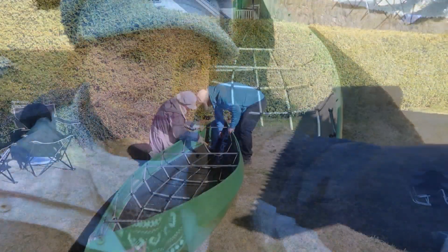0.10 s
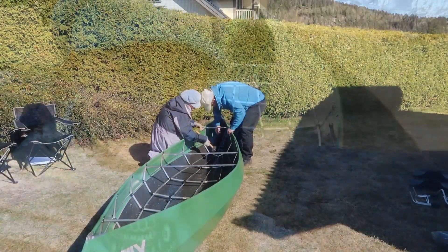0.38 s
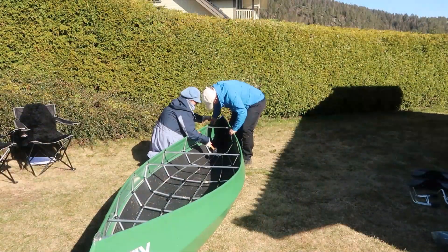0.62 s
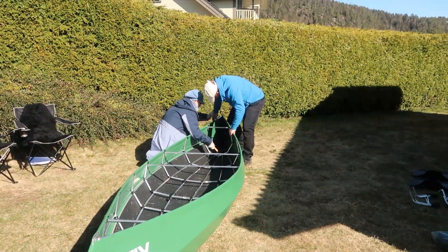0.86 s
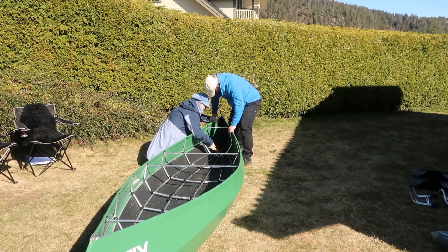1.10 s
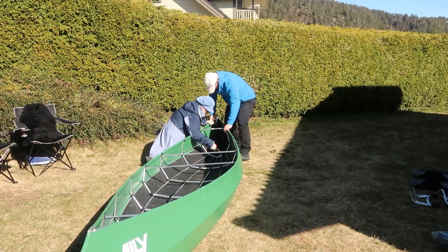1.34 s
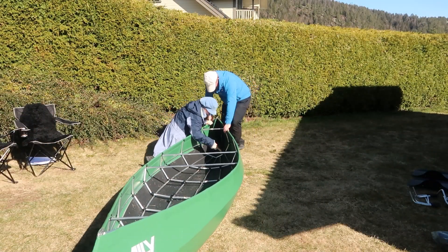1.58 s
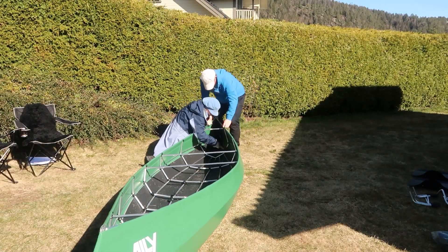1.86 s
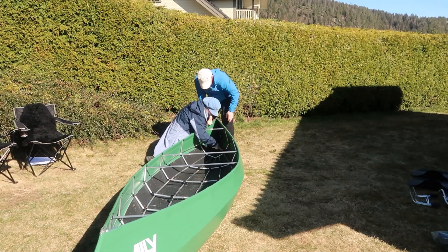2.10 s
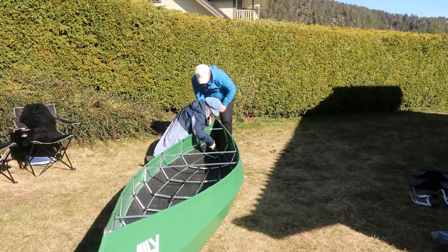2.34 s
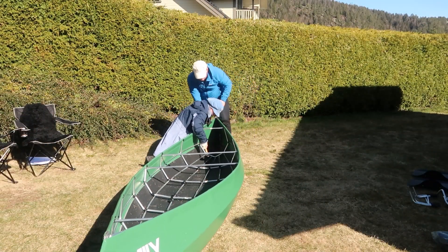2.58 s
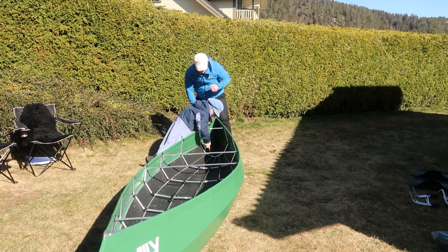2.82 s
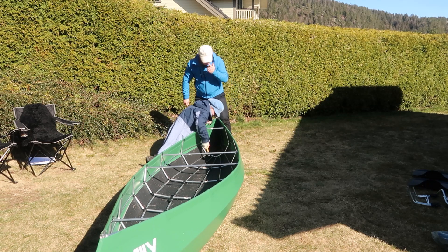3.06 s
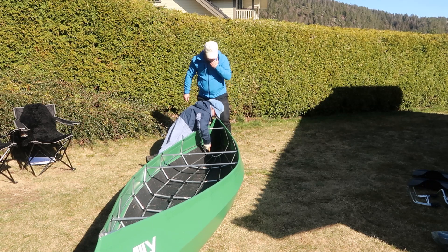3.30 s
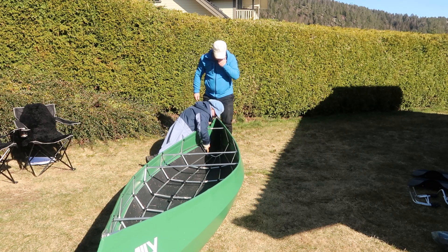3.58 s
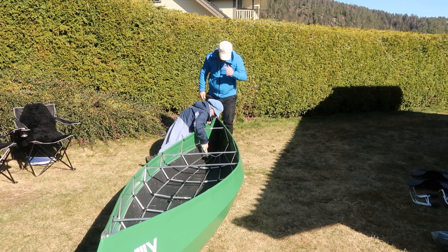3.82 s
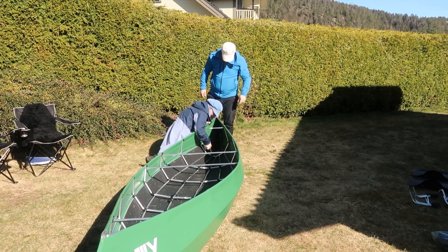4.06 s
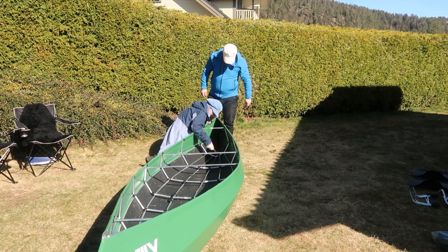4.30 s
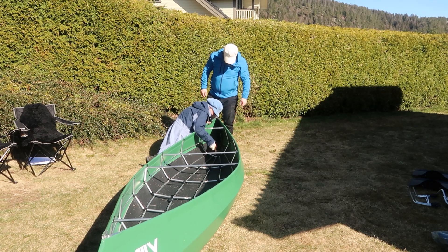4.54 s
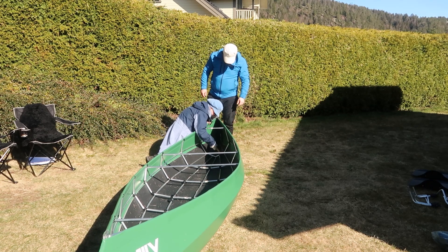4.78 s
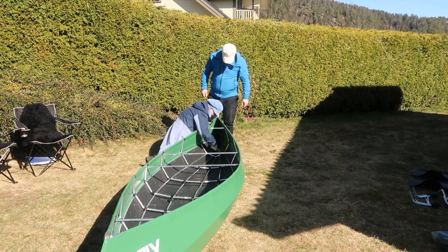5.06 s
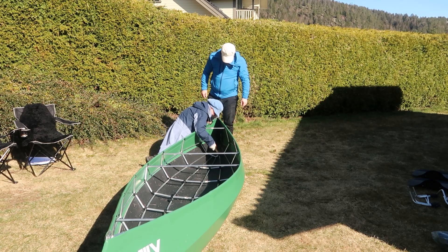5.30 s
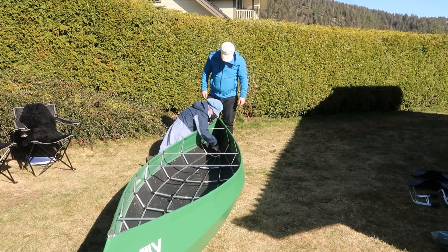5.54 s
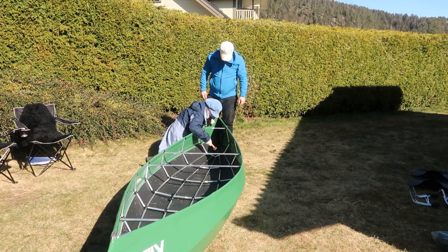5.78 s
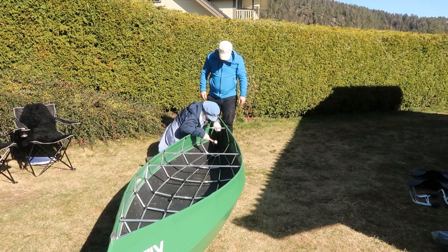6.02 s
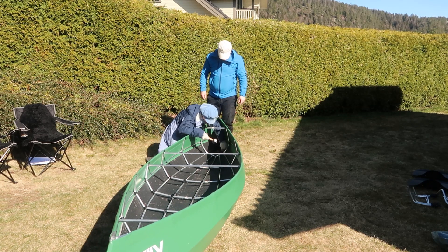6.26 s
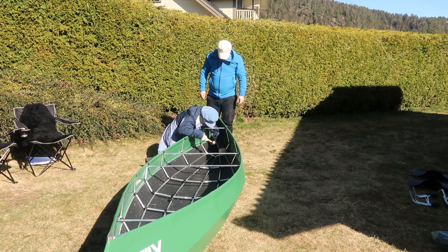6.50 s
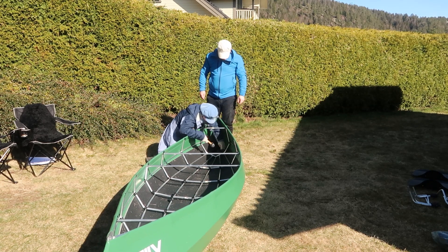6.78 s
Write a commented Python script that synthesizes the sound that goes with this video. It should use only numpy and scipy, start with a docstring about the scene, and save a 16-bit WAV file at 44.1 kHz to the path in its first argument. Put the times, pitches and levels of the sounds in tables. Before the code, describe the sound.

A short stretch of soft airy hiss with tiny scuffs drops into a blink of silence. Then a quieter open garden, where wind thuds in low flutters against the microphone. From about two seconds, nine hard, dry mallet knocks hit a light tube frame at uneven gaps, some with small rebounds and a faint scattered echo from house and hedge. The knocks stop before six seconds and the wind swells.

```python
"""Mallet blows on a folding boat

Outdoors on a lawn, a mallet knocks a boat's tube frame nine times; some blows rebound.
Each blow is a burst of contacts exciting damped modes; scattered echoes of house and hedge answer.
Wind buffets the microphone as clumped pressure pulses over a quiet garden hiss of filtered noise.
A closer view with a slightly louder air and small scuffs comes first and ends in a short silence.
One faint bird whistle, a falling sine, sounds late on the lawn."""
import sys
import numpy as np
from scipy import signal
from scipy.fft import rfft, irfft
from scipy.io import wavfile
from scipy.ndimage import uniform_filter1d

SR = 44100
rng = np.random.default_rng(int(sys.argv[2]) if len(sys.argv) > 2 else 0)


def convert_level_to_amplitude(level_db):
    """Map a level in decibels to its linear amplitude factor."""
    exponent = np.asarray(level_db, float) / 20
    return 10 ** exponent


def waveform_to_disk(signal):
    """Save audio, clipped to [-1, 1], as 16-bit WAV at the path in sys.argv[1]."""
    frames = np.transpose(np.atleast_2d(signal))
    scaled = np.clip(frames, -1, 1) * 32767
    samples = np.round(scaled).astype(np.int16)
    wavfile.write(sys.argv[1], SR, samples)


N = 303981  # length [samples]

# Silence between close view and lawn: (start [s], end [s])
SILENCE_SPAN = (.654, .692)
# Air of the close view and of the lawn: (time [s], level [dB])
CLOSE_AIR_LEVEL = [(0.0, -53.5), (0.196, -56.5), (0.23, -54), (0.286, -57), (0.444, -56.5), (0.462, -57),
                   (0.652, -57.5)]
LAWN_AIR_LEVEL = [(.7, -69), (1.17, -69), (1.35, -64.5), (1.66, -68.5), (1.85, -64), (2.05, -74.5),
                  (2.44, -76.5), (2.9, -71.5), (3.5, -77.5), (4.0, -75.5), (4.45, -79), (4.85, -75),
                  (5.449, -77.5), (5.7, -75.5), (6.5, -69), (6.89, -70)]
# Spectra of the two airs: (frequency [Hz], density [dB per Hz])
CLOSE_AIR_SPECTRUM = [(15, -28.5), (25, -3), (96, -5), (177, -19.5), (202, -7.5), (318, -19), (414, -5.5),
                      (448, -19.5), (554, -16), (1360, -22.5), (2710, -20.5), (7420, -34), (14000, -53)]
LAWN_AIR_SPECTRUM = [(15, -36.5), (25, -11), (119, 5.5), (472, -8.5), (539, -17), (703, -3.5), (892, -9),
                     (1100, -9), (1730, -7), (4480, -15.5), (9660, -27), (11600, -31.5), (14000, -44)]
# Left-right correlation of the two airs: (frequency [Hz], correlation [-1 to 1])
CLOSE_AIR_CORRELATION = [(60, 1), (240, 0.526), (950, 0.34), (3770, -0.26), (15000, -0.64)]
LAWN_AIR_CORRELATION = [(60, 1.0), (240, 1.0), (950, 0.976), (3770, 0.21), (15000, -0.85)]
# Light scuffs and ticks of handling: (time [s], level before decay [dB], centre [Hz], decay time [s])
HANDLING_SCUFFS = [(0.215, -52.5, 2180, 0.029), (0.218, -54.5, 3300, 0.014), (.598, -60, 3850, .006),
                   (.641, -59, 3270, .006), (.644, -57, 720, .007), (0.748, -60.5, 2060, 0.0094),
                   (0.761, -66.5, 1050, 0.023), (1.287, -56, 800, 0.025), (1.452, -62, 767, 0.029),
                   (1.695, -53.5, 2190, 0.0056), (6.563, -63.5, 3770, 0.0094)]

# Steady part of the wind: (time [s], buffet level [dB], deep rumble level [dB])
STEADY_WIND = [(.7, -56.5, -79), (.82, -88, -82.5), (1.22, -70, -78.5), (1.4, -53, -52), (1.76, -65.5, -63),
               (2.3, -58, -53), (2.5, -65, -58.5), (3.05, -53.5, -54.5), (3.6, -52, -56),
               (3.75, -45, -56.5), (4.08, -39.5, -53.5), (4.2, -42.5, -65.5), (4.85, -48, -58.5),
               (4.97, -63.5, -57.5), (5.3, -47.5, -62), (5.73, -55, -56), (6.25, -46, -49.5),
               (6.89, -33.5, -64.5)]
# Separate puffs: (start [s], length [s], level [dB], bright edge against it [dB])
WIND_PUFFS = [(1.276, 0.054, -60.5, -10), (1.439, 0.047, -41, -33.5), (1.511, 0.0339, -46.5, -27),
              (1.595, 0.0443, -56, -22.5), (1.804, 0.0458, -44, -27.5), (1.897, 0.0565, -49, -31.5),
              (2.015, 0.0202, -53.5, -33.5), (2.063, 0.036, -48, -40), (2.129, 0.112, -47, -39.5),
              (2.2, 0.1911, -45.5, -22.5), (2.44, 0.0207, -53, -31.5), (2.491, 0.0653, -49, -43),
              (2.598, 0.0714, -47.5, -40.5), (2.705, 0.079, -46.5, -38), (2.833, 0.118, -42, -43.5),
              (2.959, 0.053, -44.5, -37), (3.071, 0.0435, -47, -42), (3.192, 0.0216, -42, -32.5),
              (3.251, 0.0988, -41, -34), (3.403, .045, -45.5, -34.5), (3.469, 0.0336, -42, -36.5),
              (3.539, 0.0744, -47, -44), (3.643, 0.113, -42, -34.5), (3.788, 0.0437, -38, -18),
              (3.856, 0.0971, -38, -15), (4.039, 0.105, -41, -14.5), (4.218, 0.0507, -40.5, -9.5),
              (4.341, 0.068, -45.5, -12.5), (4.44, 0.0694, -48.5, -4.5), (4.623, 0.0672, -41.5, -13),
              (4.739, 0.1154, -37.5, -21.5), (4.883, 0.0382, -44, -36.5), (4.985, 0.021, -46, -39),
              (5.046, 0.17, -43.5, -27), (5.171, 0.1084, -39, -24.5), (5.348, 0.057, -56, -20.5),
              (5.554, 0.147, -42, -25), (5.801, 0.0302, -38.5, -28.5), (5.852, 0.0623, -49, -35),
              (5.929, 0.069, -45.5, -34.5), (6.09, 0.059, -37, -28), (6.181, 0.35, -35, -31),
              (6.391, 0.0305, -36, -10), (6.47, 0.0607, -31, -23.5), (6.552, 0.0699, -33.5, -15.5),
              (6.692, 0.0787, -30.5, -19), (6.8, 0.074, -46, -7)]
# Wind spectra, buffet, bright edge and deep rumble: (frequency [Hz], density [dB per Hz])
BUFFET_SPECTRUM = [(40, -49), (80, -15), (130, 2), (184, 3), (260, 2.5), (335, 1.5), (400, -4), (477, -5),
                   (530, -26.5), (700, -31), (1000, -59.5), (1500, -110)]
EDGE_SPECTRUM = [(300, -13), (550, 8), (800, -3.5), (1100, -11.5), (1600, -42), (2400, -100)]
RUMBLE_SPECTRUM = [(15, -28.5), (40, -1), (80, 16), (130, 4), (200, -14.5), (300, -42.5), (600, -100)]
# Stereo spread of the buffets: (frequency [Hz], side against mid [dB])
WIND_SPREAD = [(60, -43), (180, -27), (550, -7.5), (1650, 7.5), (4970, 20.5), (15000, 12)]
EDDIES_PER_S = 600  # mean rate of pressure pulses
PUFF_RISE_S, PUFF_FALL_S = 0.0044, 0.015
STEADY_EDGE_DB = -28.5  # bright edge of the steady wind against its buffet

# Mallet blows: (time [s], peak before radiation [dB], 420 Hz, 900 Hz and 6000 Hz against 2400 Hz [dB],
# chatter time at 2400 Hz [s])
MALLET_BLOWS = [(1.8744, -15, -7, 0, -11, 0.004), (2.243, -16.5, -21, -4, -36.5, 0.0038),
                (2.875, -18, -33, 0.5, -31, 0.0056), (3.301, -18, -24.5, -1.5, -24, 0.00379),
                (3.7118, -19.5, 5, 0.5, -22.5, 0.0054), (4.0867, -18.5, -36.5, -3, -23, 0.0055),
                (4.7765, -19.5, -40.5, 5, -26, 0.0041), (5.2035, -15.5, -15, 0, -32, 0.00367),
                (5.5914, -20.5, -10.5, 1.5, -12.5, 0.00605)]
# Light touches and rebounds: (time [s], peak before radiation [dB], dullness [dB])
LIGHT_TOUCHES = [(1.811, -42, 15), (2.8954, -36.5, 14), (2.9003, -29.5, -7.5), (3.704, -32, 4.5),
                 (3.7374, -35.5, 4.5), (4.0954, -25, -4), (4.7808, -28.5, 3.5), (5.249, -38, 2.5),
                 (5.63, -32, 6), (5.6824, -45, 16.5)]
# Modes of tubes and taut skin: (frequency [Hz], relative level [dB], longest decay t60 [s])
FRAME_MODES = [(258, 1.5, 0.056), (445.5, 4, 0.017), (710, -12.5, 0.057), (800, 4.5, 0.0057),
               (1026.2, 1, 0.011), (1271.7, -1.5, 0.021), (1612, 0, 0.013), (1909.4, 0, 0.0051),
               (2180, -12, 0.016), (2496.3, 1.5, 0.0025), (3024.8, -3.5, 0.0041), (3387, -9.5, 0.0099),
               (3890, -6, 0.0045), (4665, -1, .005), (5880, -1.5, 0.0005), (6500, -9, 0.00076),
               (7500, -17, 0.0013), (10830, -16.5, 0.0017), (12500, -24, .0015), (14800, -30.5, .0015)]
# Points at which the tilt of a blow is given: (frequency [Hz])
TILT_HZ = [420, 900, 2400, 6000]
# Radiation of the small tubes, weak in the bass: (frequency [Hz], gain [dB])
RADIATION = [(60, -58), (200, -6), (350, 3), (5000, 9), (9000, 0), (13000, 3.5), (16000, -4.5)]
# Treble of the crack out of step at the two ports: (frequency [Hz], side against mid [dB])
PORT_PHASE = [(700, -40), (2400, -28.5), (4400, -18), (8000, -5), (15000, -6)]
TOUCH_LOW_DB, TOUCH_TOP_DB, TOUCH_CHATTER_S = -17, -30.5, 0.0073
CRACK_HZ, CRACK_DB = 11065, -10.5  # the very top of the crack has this tilt in every blow
LEAD_IN_S, LEAD_IN_DB = 0.009, -16  # faint noise rising for 9 ms before each crack
RATTLE_DB, RATTLE_S = -24.5, 0.01382  # loose joints rattle on; decay time at 2400 Hz

# Decay of the returns: (frequency [Hz], t60 [s])
YARD_DECAY = [(300, 0.34), (1000, 0.2163), (2200, 0.242), (3800, 0.2165), (6500, .15), (12000, .09)]
# Colour of the blows sent into the yard: (frequency [Hz], gain [dB])
YARD_SPECTRUM = [(500, 0.5), (1000, 5), (3000, -3), (5000, -1.5), (8000, 4), (14000, -1.5)]
FAR_S, FAR_WIDTH_S, FAR_DB = 0.17, 0.045, 14.5  # a distant slope answers late and smeared
YARD_DB = -23

# A far bird: (time [s], length [s], first pitch [Hz], last pitch [Hz], peak level [dB])
BIRD_WHISTLE = (6, 0.01, 4198, 3398.5, -67.5)
CEILING = 0.36  # level of a gentle ceiling


def evened(x):
    """Normalization: scales a signal to rms 1."""
    return x / np.sqrt(np.mean(x ** 2) + 1e-20)


def read(points, hz):
    """Linear interpolation of a table on a log-frequency axis."""
    f, value = np.transpose(points)
    return np.interp(np.log(hz + 1), np.log(f + 1), value)


def curve(rows, column=1):
    """Linear interpolation of one column of a time table, for every sample."""
    return np.interp(np.arange(N) / SR, *np.transpose(rows)[[0, column]])


def add(mix, s, sound):
    """Superposition: adds a sound to the mix at time s."""
    part = mix[round(s * SR):][:len(sound)]
    part += sound[:len(part)]


def coloured(x, points, size=4096):
    """Minimum-phase filtering: a causal response with the magnitude of a table."""
    hz = abs(np.fft.fftfreq(size, 1 / SR))
    log_gain = np.log(convert_level_to_amplitude(np.maximum(read(points, hz), -100)))
    # the Hilbert transform of the log gain is the minimum phase
    spectrum = np.exp(np.conj(signal.hilbert(log_gain)))
    taps = np.fft.ifft(spectrum).real[:size // 2]
    return signal.oaconvolve(x, taps)[:len(x)]


def shaped(x, points):
    """Zero-phase filtering to rms 1: a click becomes a symmetric pulse."""
    gain = convert_level_to_amplitude(read(points, np.fft.rfftfreq(len(x), 1 / SR)))
    return evened(irfft(rfft(x) * gain, len(x)))


def air(spectrum, correlation, rows, lo_hz, hi_hz):
    """Partly correlated stereo noise with faint patches; the level is that of the band lo-hi."""
    frames, hz = N // 256 + 5, np.fft.rfftfreq(1024, 1 / SR)
    a, b, c, d, patches = rng.standard_normal((frames, 513, 5)).T
    patches = uniform_filter1d(patches, size=12, axis=0)  # across frequency
    patches = evened(uniform_filter1d(patches, size=12, axis=1))  # across time
    same = np.clip(read(correlation, hz), -1, 1)[:, None]
    left = a + 1j * b
    right = same * left + np.sqrt(1 - same ** 2) * (c + 1j * d)
    gain = convert_level_to_amplitude(read(spectrum, hz))
    z = np.array([left, right]) * gain[:, None] * convert_level_to_amplitude(2.0 * patches)
    hiss = evened(signal.istft(z, nperseg=1024, noverlap=768)[1][:, :N])
    in_band = (hz > lo_hz) & (hz < hi_hz)
    share = np.sqrt(sum(gain[in_band] ** 2) / sum(gain ** 2))
    return hiss / share * convert_level_to_amplitude(curve(rows))


def scuff(s, db, hz, decay_s):
    """Friction noise: a brief rub heard through a broad resonance, decaying exponentially."""
    t = np.arange(round(5 * decay_s * SR)) / SR
    resonance = [(hz / 2.5, -25), (hz / 1.1, -5), (hz, 0), (hz * 1.37, -8), (hz * 3, -45)]
    rub = evened(coloured(rng.standard_normal(8820)[:len(t)], resonance))
    onset = np.minimum(t / 0.00065, 1)
    return s, convert_level_to_amplitude(db) * rub * onset * np.exp(-t / decay_s)


def puffs():
    """Addition of power: steady wind plus abrupt puffs; returns amplitudes of buffet and bright edge."""
    t, steady = np.arange(N) / SR, convert_level_to_amplitude(2 * curve(STEADY_WIND))
    body, edge = steady, steady * convert_level_to_amplitude(2 * STEADY_EDGE_DB)
    for s, length, db, edge_db in WIND_PUFFS:
        rise = (t - s) / PUFF_RISE_S + 1
        fall = (s + length - t) / PUFF_FALL_S + 1
        shape = np.clip(np.minimum(rise, fall), 0, 1) ** 4
        body = body + convert_level_to_amplitude(2 * db) * shape
        edge = edge + convert_level_to_amplitude(2 * (db + edge_db)) * shape
    return np.sqrt(body), np.sqrt(edge)


def wind():
    """Turbulent pressure: eddies burst on the ports as clumped pulses over a smoother deep rumble."""
    body, edge = puffs()

    def eddies():
        """Shot noise: randomly timed pulses whose strength drifts in clumps."""
        clumps = uniform_filter1d(rng.standard_normal(N), size=500)
        clumps = evened(uniform_filter1d(clumps, size=500))
        strikes = rng.random(N) < EDDIES_PER_S / SR
        pulses = rng.uniform(-1.143, 1, N) * strikes * convert_level_to_amplitude(0.28 * clumps)
        return body * shaped(pulses, BUFFET_SPECTRUM) + edge * shaped(pulses, EDGE_SPECTRUM)

    mid = eddies()
    side = coloured(eddies(), WIND_SPREAD) * convert_level_to_amplitude(1.0)
    rumble = shaped(rng.standard_normal(N), RUMBLE_SPECTRUM) * convert_level_to_amplitude(curve(STEADY_WIND, column=2))
    return np.array([mid + side, mid - side]) + rumble


def knock(s, db, low, body, top, chatter_s):
    """Modal excitation: chattering contacts ring damped modes, the high ones more briefly."""
    age = np.arange(8000) / SR
    t = age - LEAD_IN_S  # zero at the crack
    contacts = rng.standard_normal(len(t)) * convert_level_to_amplitude(2.0 * np.minimum(rng.exponential(1, len(t)), 4))
    tilt = list(zip(TILT_HZ, [low, body, 0, top])) + [(CRACK_HZ, CRACK_DB)]
    out = np.zeros(len(t))
    for hz, mode_db, t60 in FRAME_MODES:
        span = np.clip(chatter_s, 0.001, 0.03) * (2400 / hz) ** 0.3
        lead_in = convert_level_to_amplitude(LEAD_IN_DB + 8 * t / LEAD_IN_S - 9.4 * np.log(hz / 2400).clip(0))
        chatter = np.exp(-(t.clip(0) / span) ** 1.54)
        rattle = convert_level_to_amplitude(RATTLE_DB) * np.exp(-t / RATTLE_S * (hz / 2400) ** 0.9)
        drive = np.where(t < 0, lead_in, chatter + rattle) * contacts
        ring = convert_level_to_amplitude(-60 * age / min(t60, 0.03, 17 / hz)) * np.sin(2 * np.pi * hz * age)
        ring *= 1 - np.exp(-hz * age / 0.59)  # soft contact
        mode = evened(signal.fftconvolve(ring, drive)[:len(t)])
        out += convert_level_to_amplitude(mode_db + read(tilt, hz)) * mode
    fade_out = signal.windows.tukey(2 * len(t), 0.3)[len(t):]
    return s - LEAD_IN_S, convert_level_to_amplitude(db) * out / abs(out).max() * fade_out


def ports(x):
    """Phase difference between two ports: left leads and right lags, by a phase that grows with pitch."""
    gain = convert_level_to_amplitude(read(PORT_PHASE, np.fft.rfftfreq(N, 1 / SR)))
    side = irfft(1j * rfft(x) * gain, N)  # a quarter cycle ahead
    return np.array([x + side, x - side])


def yard(x):
    """Diffuse reflection: scattered returns of lawn, hedge, house and far slope, mostly alike in both ears."""
    taps = np.zeros((2, SR // 2))
    slots = np.arange(300, SR // 2 - 12, 12)
    at = slots + rng.integers(0, 12, (2, len(slots)))
    np.put_along_axis(taps, at, rng.choice([-1., 1.], at.shape), 1)
    hz, t, z = signal.stft(taps, SR, nperseg=128)
    far_db = FAR_DB * np.exp(-((t - FAR_S) / FAR_WIDTH_S) ** 2)
    decay_db = -60 * t / read(YARD_DECAY, hz)[:, None]
    mid, side = signal.istft(z * convert_level_to_amplitude(far_db + decay_db), SR, nperseg=128)[1]
    # treble scatters wider
    side = coloured(side, [(500, -12.0), (2000, -16.0), (5000, 6.5), (9000, 10), (14000, 5)])
    tail = np.array([mid + side, mid - side]) / np.linalg.norm(mid)
    return signal.fftconvolve(x[None], tail, axes=1)[:, :N]


def bird(s, length, from_hz, to_hz, db):
    """Frequency modulation: one faint whistle, a sine gliding down under a half-sine envelope."""
    u = np.arange(0, 1, 1 / (length * SR))
    phase = 2 * np.pi * np.cumsum(from_hz + (to_hz - from_hz) * u) / SR
    return s, convert_level_to_amplitude(db) * np.sin(np.pi * u) * np.sin(phase)


def scene():
    """Superposition of sources: close view, silence, then the lawn."""
    blows, small_sounds = np.zeros(N), np.zeros(N)
    for row in HANDLING_SCUFFS:
        add(small_sounds, *scuff(*row))
    for row in MALLET_BLOWS:
        add(blows, *knock(*row))
    for s, db, dull_db in LIGHT_TOUCHES:
        low_db = TOUCH_LOW_DB + dull_db
        add(blows, *knock(s, db, low_db, dull_db, TOUCH_TOP_DB, TOUCH_CHATTER_S))
    add(small_sounds, *bird(*BIRD_WHISTLE))
    blows = coloured(blows, RADIATION)
    echoes = convert_level_to_amplitude(YARD_DB) * yard(coloured(blows, YARD_SPECTRUM))

    close = air(CLOSE_AIR_SPECTRUM, CLOSE_AIR_CORRELATION, CLOSE_AIR_LEVEL, lo_hz=25, hi_hz=12000)
    lawn = air(LAWN_AIR_SPECTRUM, LAWN_AIR_CORRELATION, LAWN_AIR_LEVEL, lo_hz=1452, hi_hz=6000)
    t = np.arange(N) / SR
    before = np.clip((SILENCE_SPAN[0] - t) / 0.003, 0, 1)  # 3 ms fade
    after = t > SILENCE_SPAN[1]
    return (close + small_sounds) * before + (lawn + wind() + small_sounds + ports(blows) + echoes) * after


def top_cut(x):
    """Nothing passes above the cut-off."""
    return signal.sosfilt(signal.butter(12, 16490, fs=SR, output="sos"), x)


def record(dry):
    """Saturation: a soft ceiling rounds off the loudest cracks."""
    finished = CEILING * np.tanh(dry / CEILING)
    return top_cut(finished)


dry = scene()
out = record(dry)
waveform_to_disk(out)
```